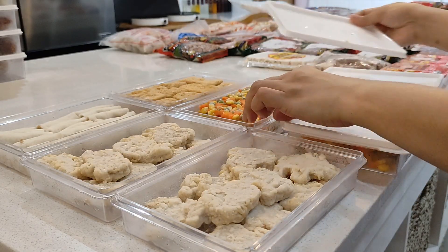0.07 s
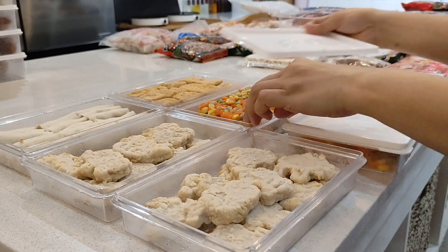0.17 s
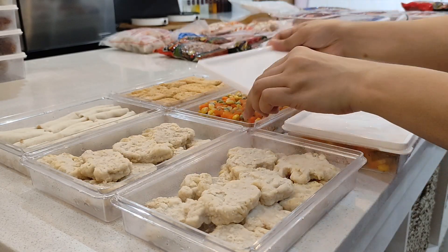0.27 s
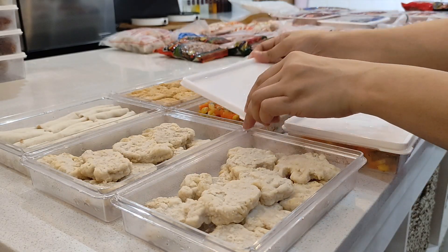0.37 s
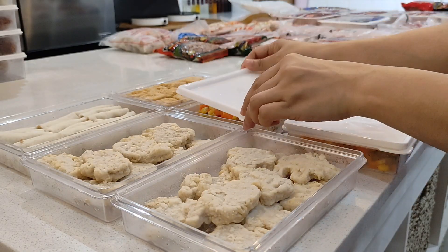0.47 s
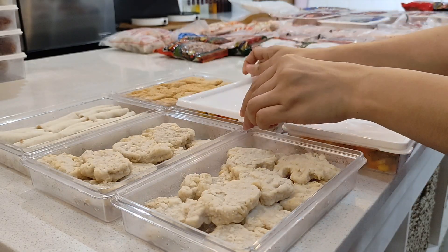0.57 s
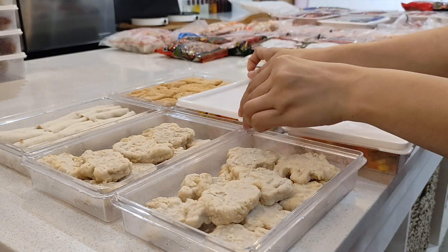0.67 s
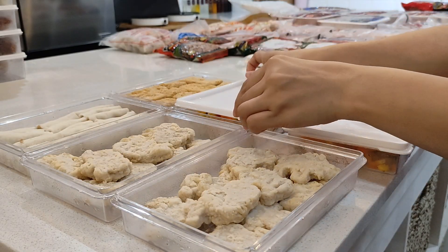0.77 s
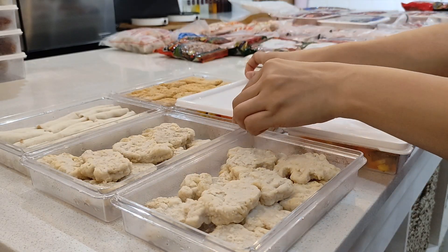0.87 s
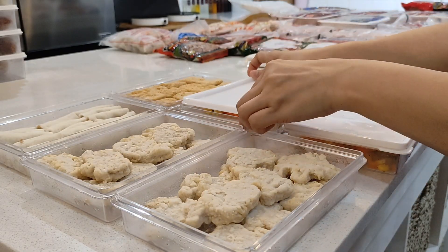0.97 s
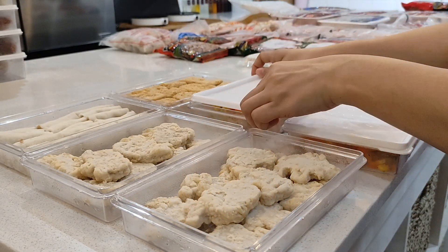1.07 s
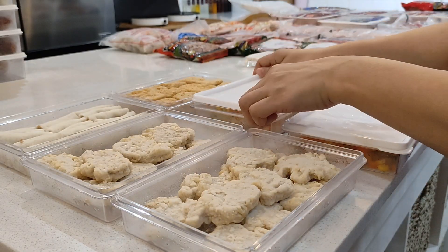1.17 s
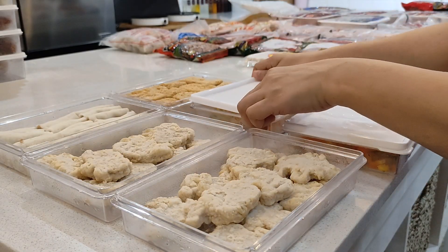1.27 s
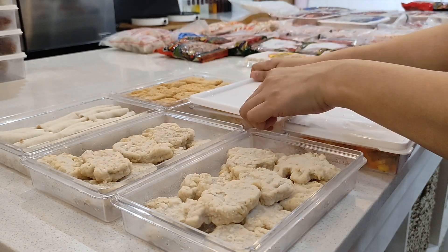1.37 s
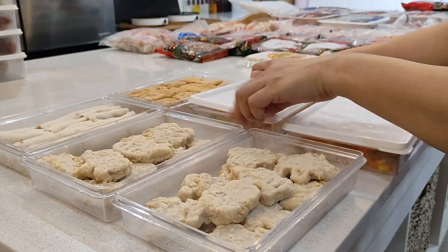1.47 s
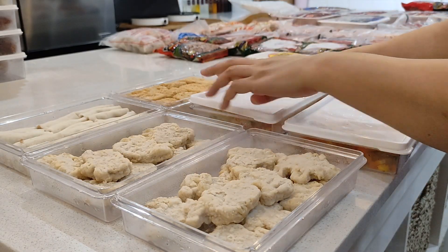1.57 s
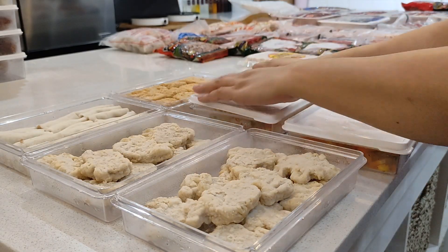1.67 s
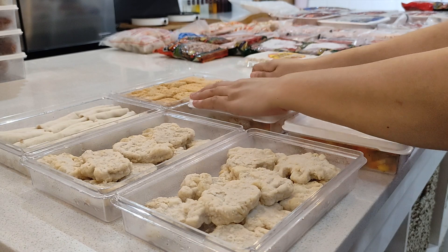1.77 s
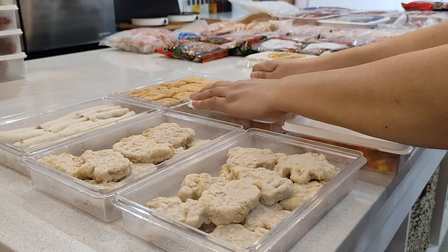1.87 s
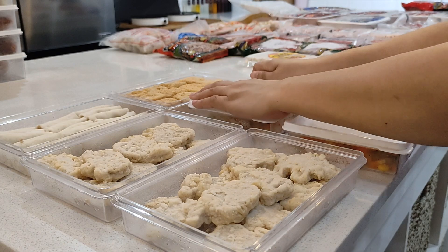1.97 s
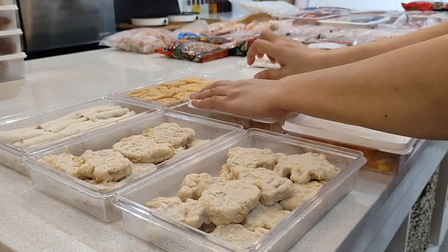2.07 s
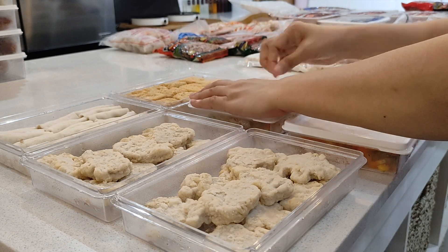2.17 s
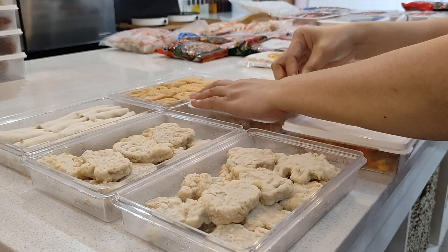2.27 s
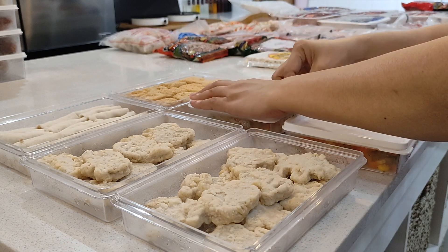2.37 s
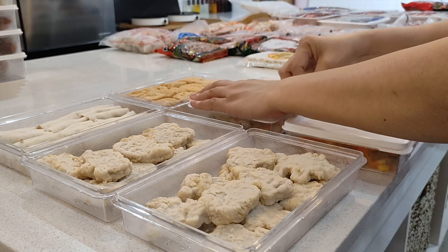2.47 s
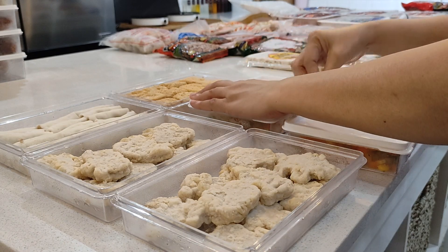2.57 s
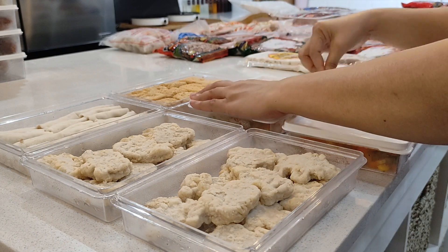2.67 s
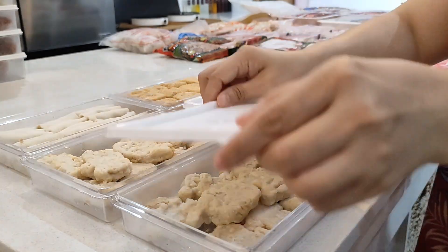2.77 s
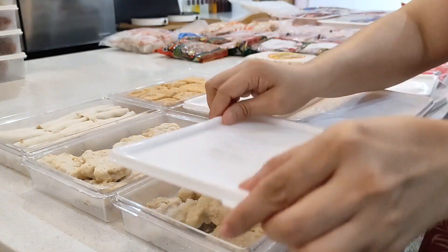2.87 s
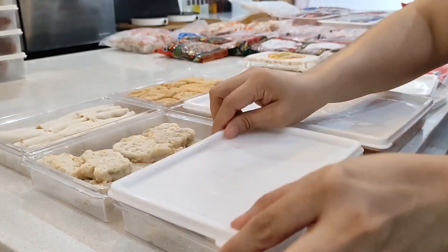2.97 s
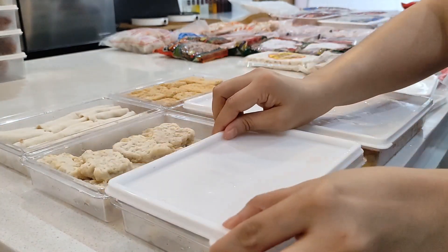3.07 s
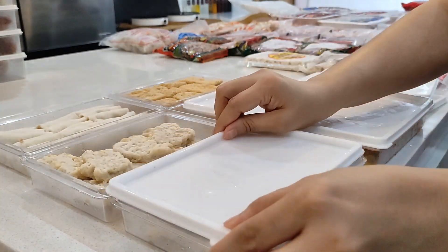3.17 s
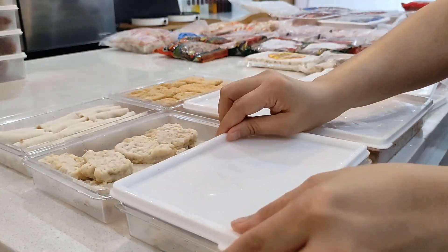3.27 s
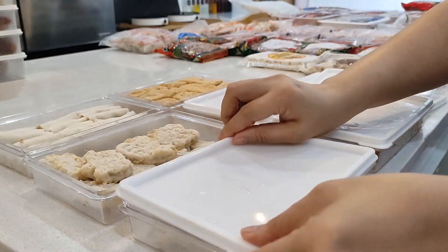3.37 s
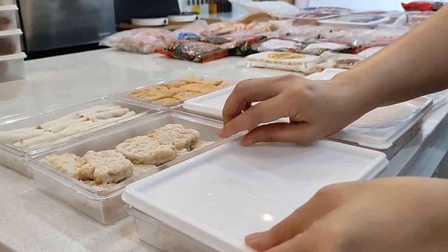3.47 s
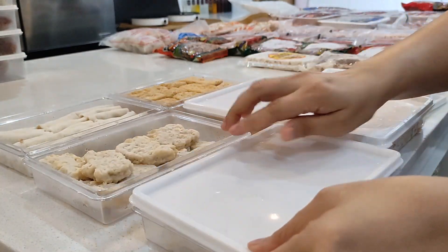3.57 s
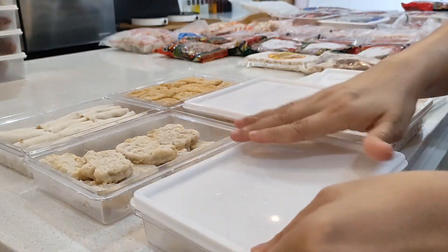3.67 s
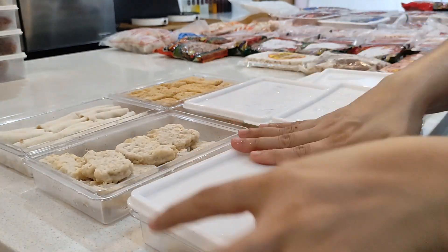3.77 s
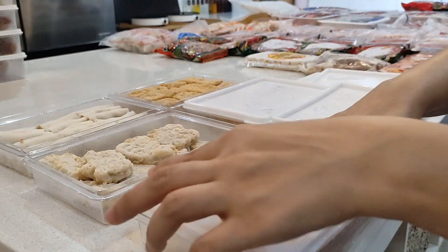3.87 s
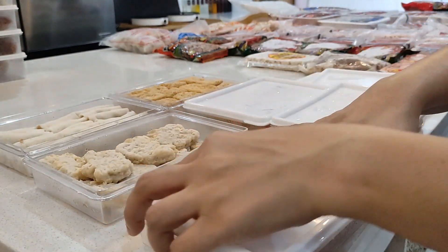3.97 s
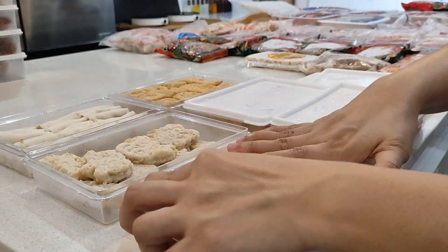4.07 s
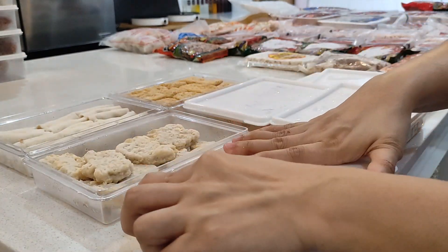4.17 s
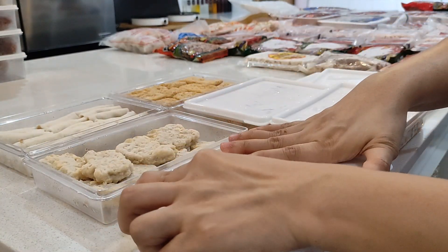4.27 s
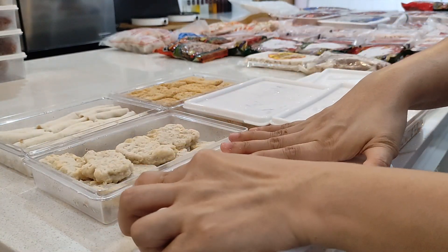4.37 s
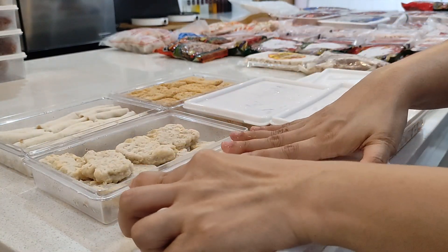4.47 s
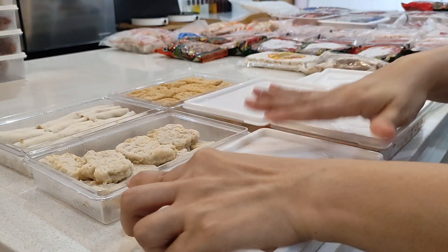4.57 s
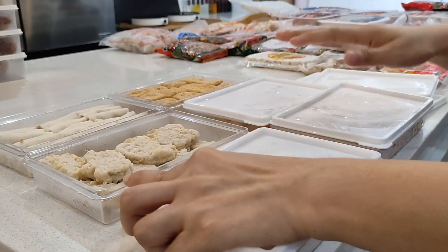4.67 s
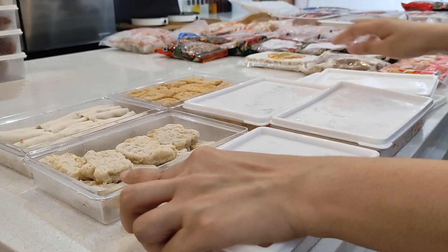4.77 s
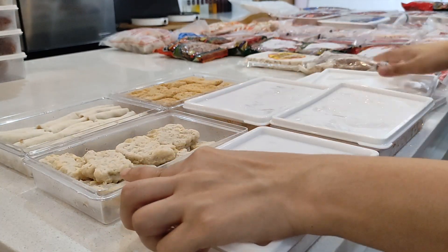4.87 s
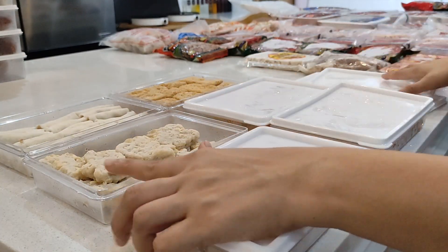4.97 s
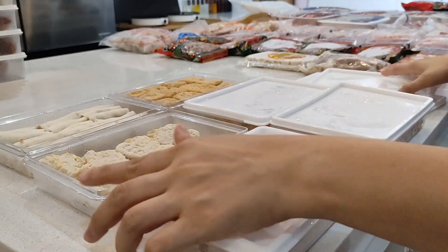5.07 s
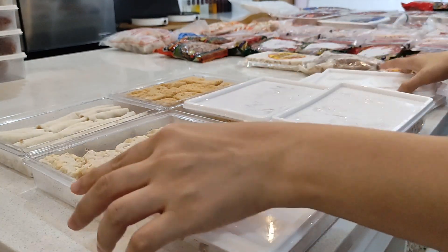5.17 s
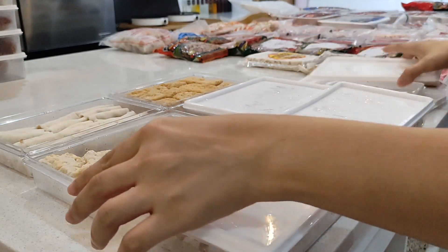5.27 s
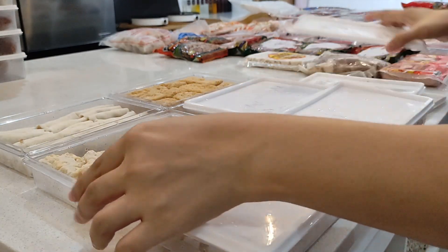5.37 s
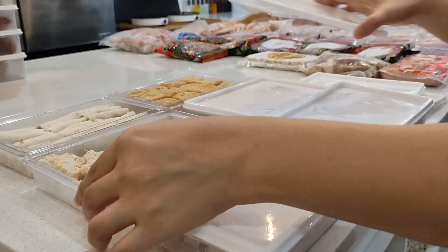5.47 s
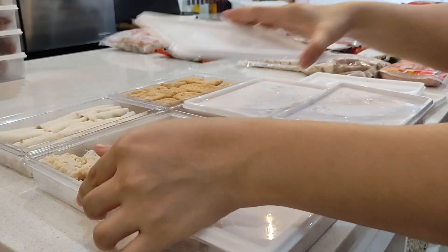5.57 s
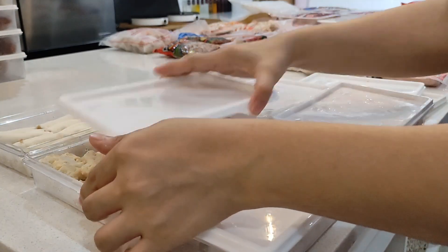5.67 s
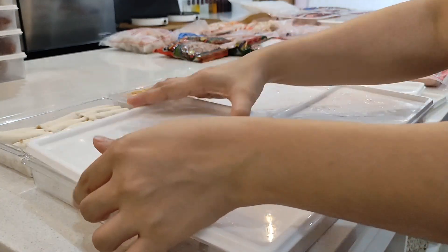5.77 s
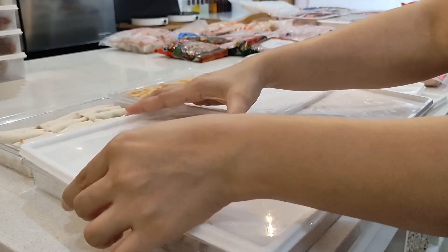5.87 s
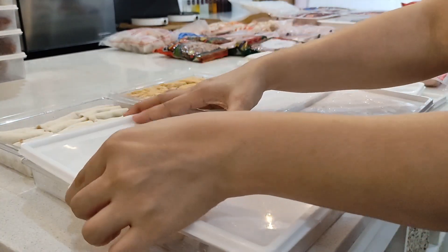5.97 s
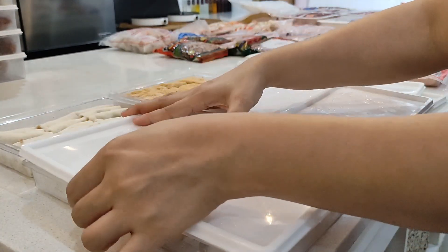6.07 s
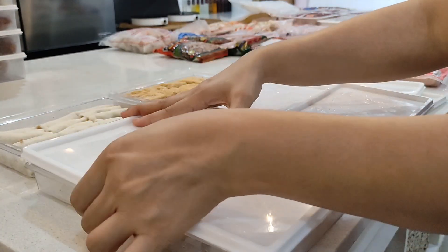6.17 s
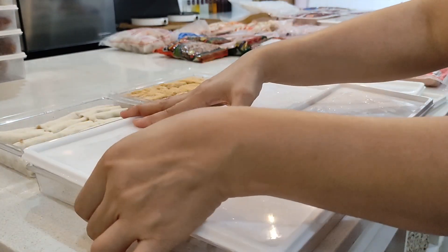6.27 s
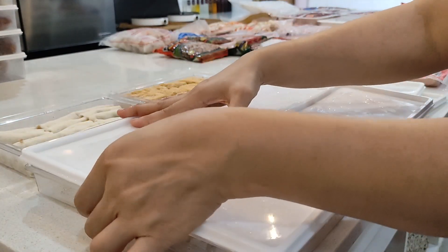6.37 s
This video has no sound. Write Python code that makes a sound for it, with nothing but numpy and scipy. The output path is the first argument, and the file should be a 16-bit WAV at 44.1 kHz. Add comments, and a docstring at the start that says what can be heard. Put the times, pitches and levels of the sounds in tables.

```python
"""Closing food boxes in a kitchen

Thin plastic lids are laid on boxes and pressed shut on a counter, close to a camera's two microphone ports.
Rims knock, snap and tick, a palm thuds on a box, and fingers and lids scrape and rustle. A rim creaks into
its groove and squeezed air whistles faintly. Hard walls answer the blows and creaks, over a low hum."""
import sys
import numpy as np
from scipy import signal
from scipy.fft import rfft, irfft, next_fast_len
from scipy.io import wavfile
from scipy.ndimage import map_coordinates

SR = 44100
rng = np.random.default_rng(int(sys.argv[2]) if len(sys.argv) > 2 else 0)


def put_to_file(sound):
    """Save the sound as 16-bit audio at rate SR, in the file named by the first command-line argument."""
    columns = np.atleast_2d(sound).T  # one column per channel
    safe = np.clip(columns, -1, 1)
    whole_steps = np.round(safe * 32767)
    wavfile.write(sys.argv[1], SR, whole_steps.astype(np.int16))


N = 282681


def amp(db):
    """Decibels to gain."""
    return 10 ** (np.asarray(db) / 20)


def unit(x):
    """Scale to rms 1."""
    return x / np.sqrt(np.mean(x ** 2) + 1e-20)


def peaked(x):
    """Scale to peak 1."""
    return x / np.max(np.abs(x))


def along(points, hz):
    """Read (Hz, value) points on a log frequency axis."""
    point_hz, values = np.transpose(points)
    return np.interp(np.log(hz + 1), np.log(point_hz + 1), values)


def curves(rows):
    """One value per sample for each column after the time."""
    times, *columns = np.transpose(rows)
    return [np.interp(np.arange(N) / SR, times, column) for column in columns]


def wobble(rate):
    """A smooth random curve with rate knots a second."""
    return map_coordinates(rng.standard_normal(int(N * rate / SR) + 4), [np.arange(N) * rate / SR])


def swell(t, release_at_s, attack_s, release_s):
    """Attack, hold and release; t counts from the start."""
    return np.clip(t / attack_s, 0, 1) ** 2 * np.clip(1 - (t - release_at_s) / release_s, 0, 1) ** 2


def filtered(x, response):
    """Filter x by a gain given as a function of Hz."""
    n = x.shape[-1]
    size = next_fast_len(n + 2048)
    return irfft(rfft(x, size) * response(np.fft.rfftfreq(size, 1 / SR)), size)[..., :n]


def noise_band(centre_hz, half_width_hz):
    """A narrow band of noise at rms 1."""
    return unit(filtered(rng.standard_normal(N), lambda hz: 1 / (1 + ((hz - centre_hz) / half_width_hz) ** 2)))


def diffuse(pair, colour):
    """Colour two noises and blend them like sound reaching the ports from all sides."""
    # Each row: frequency in Hz, left-right correlation.
    likeness = [(30, 0.28), (200, 0.91), (600, 0.42), (1500, 0.033), (4000, 0.033), (12000, 0.039)]
    angle = lambda hz: np.arccos(np.clip(along(likeness, hz), -1, 1)) / 2
    mid, side = filtered(pair, lambda hz: amp(along(colour, hz)) * [np.cos(angle(hz)), np.sin(angle(hz))])
    return np.array([mid + side, mid - side])


def kitchen(x):
    """Hard walls answer 5 ms late, each frequency dying at its own speed."""
    # Each row: frequency in Hz, reverberation time (t60) in seconds.
    decay_times = [(200, 0.64), (500, 0.46), (1000, 0.51), (2000, 0.55), (3000, 0.67), (6000, 0.54),
                   (10000, 0.6), (15000, 0.51)]
    # Each row: frequency in Hz, strength of the walls' answer in dB.
    wall_colour = [(200, -10.5), (500, -1), (900, -5.5), (1600, -8), (2800, -4.5), (5000, -7.5), (7300, -7),
                   (9000, -6.5), (12000, -7), (15500, -5)]
    hz, t, spectra = signal.stft(rng.standard_normal((2, SR // 2)), SR, nperseg=256)
    tail = signal.istft(spectra * amp(-60 * t / along(decay_times, hz)[:, None]), SR, nperseg=256)[1]
    tail = diffuse(tail / np.linalg.norm(tail[0]), wall_colour)
    return signal.fftconvolve(np.pad(x, (220, 0))[None], tail, axes=1)


def place(left, right, to_walls, start_s):
    """A close sound reaches the right port first, then the left; the kitchen answers."""
    # Where the hands work. Each row: time in seconds, left port's lag in ms, left over right in dB.
    hands = [(0, 0.099, -0.8), (1.5, 0.084, -2.5), (2.851, 0.06, -3.5), (3.3, 0.072, -2),
             (3.7, 0.023, -1.5), (4.3, 0.056, -2), (5.6, 0.21, -3.5), (6.41, 0.18, -2.2)]
    times, lags, pans = np.transpose(hands)
    lag_ms, pan_db = np.interp(start_s, times, lags), np.interp(start_s, times, pans)
    late_left = filtered(left, lambda hz: np.exp(-2j * np.pi * hz * lag_ms / 1000))
    sound = kitchen(to_walls)
    sound[:, :len(left)] += amp([[pan_db / 2], [-pan_db / 2]]) * [late_left, right]
    start = round(start_s * SR)
    return np.pad(sound[:, :N - start], ((0, 0), (start, max(N - start - sound.shape[1], 0))))


def hum():
    """Machines and the street drone through the room, with two wavering machine tones."""
    # Each row: time in seconds, level in dB.
    levels = [(0, -49.5), (1.02, -52), (1.96, -52), (2.95, -52.5), (3.41, -55.5), (3.93, -47.5),
              (4.19, -52.5), (5.34, -54), (5.69, -54), (6.41, -54)]
    # Each row: frequency in Hz, relative spectral density in dB.
    colour = [(12, -56), (20, -38), (32, -58), (49, -14.5), (87, -10), (135, -4), (195, -5), (232, -1.5),
              (273, -6), (357, -4.5), (461, -13.5), (558, -14), (900, -20), (1170, -43), (1980, -120)]
    # Each row: centre in Hz, half width in Hz, level in dB.
    machine_tones = [(63, 5.3, -67.5), (367.7, 9.1, -66)]
    (db,) = curves(levels)
    out = amp(db + 1.8 * wobble(1.81)) * unit(diffuse(rng.standard_normal((2, N)), colour))
    for hz, half_width_hz, tone_db in machine_tones:
        out += amp(tone_db) * noise_band(hz, half_width_hz)
    return out


def rumble():
    """A low drone comes and goes, the same at both ports."""
    # Each row: time in seconds, level in dB.
    levels = [(0, -58), (.5, -65.5), (1.5, -55), (2.12, -54), (2.89, -65), (3.62, -64), (3.84, -55),
              (4.1, -69), (6.03, -62), (6.21, -56), (6.41, -68)]
    (db,) = curves(levels)
    return amp(db + 1.2 * wobble(17)) * noise_band(centre_hz=145, half_width_hz=25)


def sliding():
    """Skin and plastic drag over plastic in grainy strokes, over room hiss of the same colours."""
    # Each row: start in seconds, seconds until release, scrape level in dB, rustle level in dB.
    strokes = [(0, 0.14, -55, -64), (.3, 0.082, -71, -70), (0.445, 0.35, -60, -69), (.82, 0.26, -61, -65.5),
               (1.085, .1, -58, -75), (1.236, .17, -58.5, -59.5), (1.454, 0.061, -54.5, -51.5),
               (1.541, 0.17, -60, -60), (1.88, 0.12, -63, -66), (2.265, 0.083, -63, -76),
               (2.514, 0.19, -53.5, -64.5), (3.164, 0.17, -63, -62.5), (3.443, 0.31, -56, -66),
               (4.113, 0.18, -56, -73), (4.373, 0.21, -64.5, -71.5), (4.802, 0.19, -63.5, -65.5),
               (5.14, 0.076, -67, -66.5), (5.678, .25, -53.5, -73), (6.02, 0.16, -66, -66)]
    # The dull scrape and the bright rustle. Each row: frequency in Hz, relative spectral density in dB.
    scrape_colour = [(240, -39), (400, -15), (471, -7), (635, -11.5), (808, -2.5), (881, -2.5), (1230, -1),
                     (1390, -4.5), (1530, -1.5), (2180, -11), (4000, -17), (5200, -71), (8800, -120)]
    rustle_colour = [(1470, -64), (2500, -4), (3110, -12), (4310, 1.5), (5310, -4.5), (6700, -2),
                     (7250, -12), (8660, 0), (9890, -5.5), (12500, 0.5), (14900, -13), (15600, -8),
                     (16000, -58)]
    out, t = np.zeros((2, N)), np.arange(N) / SR
    grain = amp(1.25 * wobble(120))
    start_s, held_s, scrape_db, rustle_db = np.transpose(strokes)[:, :, None]
    shape = swell(t - start_s, held_s, attack_s=0.0097, release_s=0.061)
    for db, colour, hiss_db in (scrape_db, scrape_colour, -62.5), (rustle_db, rustle_colour, -69):
        hiss_power = amp(hiss_db + 1.7 * wobble(6.7)) ** 2
        stroke_power = np.sum((amp(db) * shape) ** 2, axis=0) * grain ** 2
        out += np.sqrt(hiss_power + stroke_power) * unit(diffuse(rng.standard_normal((2, N)), colour))
    return out


def thuds():
    """A palm pushes the box, which answers with one low, soft mode."""
    # Each row: start in seconds, gain in dB.
    pushes = [(0.021, -33), (0.431, -31), (.826, -36), (3.315, -20), (3.683, -29), (3.752, -18.5),
              (3.878, -40), (3.925, -37)]
    box_hz, t60_s, rise_s = 240, 0.047, 0.0068
    t = np.arange(SR // 10) / SR
    thud = amp(-60 * t / t60_s) * (1 - np.exp(-t / rise_s)) * np.sin(2 * np.pi * box_hz * t)
    return sum(place(*[amp(db) * thud] * 3, start_s) for start_s, db in pushes)


def crack(peak_db, tilt_db, t60_s):
    """The rim cracks: a separate noise burst for each port, and a click to feed the walls."""
    # The bright crack as heard at the ports. Each row: frequency in Hz, relative spectral density in dB.
    crack_colour = [(1180, -21), (2000, -6), (2240, 0.5), (4180, -2.5), (5440, -7), (5990, -10), (6490, -8.5),
                    (8290, -12), (8980, -4.5), (10300, -17), (11500, -8.5), (14600, -20.5), (15600, -30),
                    (16300, -39)]
    t = np.arange(SR // 10) / SR
    colour = lambda hz: amp(along(crack_colour, hz) + tilt_db * np.log2(np.maximum(hz, 1500) / 6000))
    envelope = amp(-60 * t / t60_s) * (1 - np.exp(-t / 0.00005))
    pair = amp(peak_db) * peaked(filtered(envelope * rng.standard_normal((2, len(t))), colour))
    click = filtered(np.arange(len(t)) == 40, colour)
    return *pair, click * np.linalg.norm(pair) / np.sqrt(2) / np.linalg.norm(click)


def knocks():
    """Rims knock and snap: each blow cracks at the rim and rings the lid modes near its pitch."""
    # Each row: start in seconds, ring's peak in dB, pitch in Hz, upper modes' gain in dB, their centre in
    # Hz, t60 at 800 Hz in seconds, crack over ring in dB, crack's tilt in dB per octave.
    blows = [(.023, -22.5, 480, -18.5, 1540, 0.015, -10, -1.2), (.29, -36.5, 670, -2, 1630, .028, 1, 5),
             (0.404, -28, 900, -8, 1210, 0.032, -3.5, 1), (0.431, -29.5, 1130, -20, 1150, 0.013, -19, .1),
             (.491, -23.5, 806, -3, 1770, 0.018, -10, -1), (.516, -12, 740, -10, 1680, 0.026, -14.5, 2),
             (.539, -28.5, 685, -30, 1320, 0.049, -25, 6), (.574, -34, 620, -13, 1430, 0.033, -19, 2.2),
             (.609, -37.5, 766, -12, 1760, .03, -6, -4), (.659, -36, 690, -20, 1570, 0.035, -28, 1.2),
             (.695, -39, 720, -17, 1550, 0.035, -6, .1), (0.775, -43.5, 1250, -9, 1310, 0.028, -20, 2),
             (.826, -40.5, 654, -2, 1580, 0.042, 5, 1), (0.883, -41.5, 476, -4, 1560, 0.021, .6, 2),
             (0.97, -43, 479, -10, 1500, .024, -23, .1), (1.016, -32.5, 623, -16, 1300, .031, -16, .1),
             (1.169, -38.5, 460, -12, 1480, .069, -24, .1),
             (1.187, -30.5, 1000, -22, 1150, 0.023, -25, 2.2), (1.202, -27.5, 790, 3, 1220, 0.033, -4.5, 0),
             (1.221, -34, 500, -16, 1290, 0.046, -3, 9), (1.243, -34, 470, -14, 1500, 0.022, -25, .1),
             (1.652, -35, 513, -20, 1290, 0.037, -7, -7), (2.317, -41.5, 507, -9, 1400, 0.031, -15, 7),
             (2.84, -25, 760, -3, 1550, .039, 2, -2), (2.93, -16, 850, -6, 1290, 0.026, 1, 0.8),
             (2.937, -20.5, 585, -11, 1270, 0.037, -6, -4), (2.957, -35, 1020, -25, 1150, .024, -22, -1.5),
             (3.135, -29, 665, -19, 1400, 0.023, -6.5, -2.5),
             (3.254, -33.5, 474, -28, 1570, 0.022, -21, 2.5), (3.308, -32, 1000, -13, 1550, .033, -9, -1),
             (3.314, -30, 670, -13, 1150, .046, 3, -3), (3.317, -20.5, 567, -9, 1690, 0.032, -8, -4),
             (3.321, -4, 536, -1.5, 1250, 0.02, -4, 3), (3.664, -27, 610, -35, 1170, 0.046, -3.5, 6.5),
             (3.684, -36.5, 1010, -20, 1600, .047, 1, -1), (3.751, -34, 760, -11, 1530, 0.027, -9.5, -6),
             (3.866, -37, 730, -29, 1480, 0.026, -5, 3), (3.879, -36, 456, -12, 1220, 0.028, -4, 0),
             (4.122, -42, 670, 4, 1610, .021, 5.5, -1), (4.142, -26, 634, -23, 1800, 0.017, -3.5, -2),
             (4.195, -36, 802, 11, 1770, .019, 7, -6.5), (4.268, -43, 740, 2, 1760, 0.021, 2, -6),
             (4.286, -45, 813, -6, 1900, .025, -3, -6), (4.467, -41.5, 465, -19, 1150, .046, -21, .1),
             (4.572, -47, 571, -7, 1490, .015, -4, -6), (4.889, -53, 1150, -1.5, 1160, .038, 8, -5),
             (5.689, -32, 730, -3, 1170, 0.045, 5, 6.5), (5.705, -29, 640, -13.5, 1510, 0.075, 2.2, 4),
             (5.744, -20, 794, -6, 1560, 0.04, -2.5, 1.2), (5.761, -33, 790, -27, 1580, 0.061, -22, .1),
             (5.778, -31, 650, -11, 1570, .042, -12, -2), (5.806, -32, 686, -29, 1150, 0.074, -24, .1),
             (5.84, -39.5, 670, -25, 1540, 0.046, -17, -3),
             (5.88, -28.5, 1000, -19, 1190, 0.021, -10.5, -0.5),
             (5.911, -23.5, 970, -41, 1150, 0.015, -18.5, -1.2),
             (6.013, -32, 760, -11, 1170, 0.02, -18, .1), (6.121, -30, 744, -13, 1720, .021, -14, -10),
             (6.212, -38.5, 575, -19, 1680, 0.031, -26, -2.2),
             (6.341, -39.5, 535, -26, 1590, 0.034, -28, -1), (6.382, -43, 620, -24, 1320, .026, -28, 5)]
    # A lid on its box. Each row: mode frequency in Hz, relative level in dB.
    lid_modes = [(430, -2.5), (530, -3.5), (625, -1.5), (710, -0.5), (795, 2), (945, 3.5), (1050, 0.5),
                 (1220, 1), (1360, 4.5), (1570, 7), (1730, 6.5), (1900, -14), (2400, -6), (2650, -27),
                 (2950, 6)]
    hz, mode_db = np.array(lid_modes).T[:, :, None]
    out, t = np.zeros((2, N)), np.arange(SR // 10) / SR
    for start_s, db, pitch_hz, upper_db, upper_hz, t60_s, crack_db, tilt_db in blows:
        near_pitch = amp(-27 * np.log2(hz / pitch_hz) ** 2)
        upper = amp(upper_db - 48 * np.log2(hz / upper_hz) ** 2)  # reached by a hard, quick blow
        gain = (near_pitch + upper) * amp(mode_db + rng.normal(0, 2, hz.shape))
        detune = 1 + rng.normal(0, .015, hz.shape)  # fingers load the lid differently at every blow
        envelope = amp(-60 * t / t60_s * (hz / 800) ** 0.13) * (1 - np.exp(-t / 0.0013))
        phase = rng.uniform(-1.76, 1, hz.shape)  # modes reach the ports over different paths
        modes = np.sum(gain * envelope * np.sin(2 * np.pi * hz * detune * t + phase), axis=0)
        ring = np.roll(amp(db) * peaked(modes), 25)  # the lid answers a moment after the rim
        left, right, click = crack(db + crack_db, tilt_db, t60_s=0.024)
        out += place(ring + left, ring + right, ring + click, start_s)
    return out


def ticks():
    """Bright little cracks of the rim that do not ring the lid."""
    # Each row: start in seconds, peak in dB.
    rim_ticks = [(1.29, -42), (1.356, -35), (1.438, -31), (1.464, -37), (1.478, -28.5), (1.486, -30),
                 (1.584, -34.5), (1.617, -39), (1.631, -32), (3.82, -48), (4.391, -50)]
    return sum(place(*crack(db, tilt_db=4.5, t60_s=0.025), start_s) for start_s, db in rim_ticks)


def creaks():
    """The rim sticks and slips into its groove: one jerk a cycle, slower and sharper as it seats."""
    # Each row: start and length in seconds, first and last slip rate in Hz, first and last gain in dB,
    # sharpness aimed for (0-1), grit's gain in dB, grit's treble corner in Hz.
    seatings = [(3.961, .059, 563, 227.7, -28.5, -28, 0.96, -17, 2300),
                (4.16, .021, 985, 734, -31.5, -18, 0.41, -7, 6800)]
    attack_s, release_s = 0.0057, 0.0073
    out, harmonic = np.zeros((2, N)), np.arange(1, 21)[:, None]
    for start_s, length_s, first_hz, last_hz, first_db, last_db, last_sharp, grit_db, grit_hz in seatings:
        t = np.arange(0, length_s, 1 / SR)
        seated = t / length_s
        slip_hz = first_hz * (last_hz / first_hz) ** seated * (1 + rng.normal(0, 0.094, len(t)))
        phase = 2 * np.pi * np.cumsum(slip_hz) / SR
        sharpness = np.clip(0.2 + (last_sharp - 0.2) * seated, .05, .9)
        jerks = np.sum(sharpness ** (harmonic - 1) * np.cos(harmonic * phase), axis=0)
        # The lid radiates little outside its own modes.
        jerks = filtered(jerks, lambda hz: 1 / (1 + (hz / 1400) ** 4) / (1 + (300 / (hz + 1)) ** 4))
        scrapes = (1 + np.cos(phase)) ** 2 * rng.standard_normal((2, len(t)))  # one at each slip
        scrapes = filtered(scrapes, lambda hz: hz ** 2 / (hz ** 2 + 1500 ** 2) / (1 + (hz / grit_hz) ** 2))
        grit = amp(grit_db) * sharpness * unit(scrapes)
        gain = amp(first_db + (last_db - first_db) * seated)
        left, right = -gain * swell(t, length_s - release_s, attack_s, release_s) * (jerks + grit)
        out += place(left, right, left, start_s)
    return out


def whistle():
    """Air squeezed past the rim: a faint, thin tone that falls as the pressure eases."""
    # Each row: time in seconds, pitch in Hz, level in dB.
    glide = [(3.97, 12800, -95), (4.0, 13500, -70), (4.03, 13500, -71), (4.07, 12700, -67),
             (4.1, 12000, -68), (4.125, 11900, -90)]
    hz, db = curves(glide)
    return amp(db + 1.8 * wobble(60)) * np.sin(2 * np.pi * np.cumsum(hz + 60 * wobble(200)) / SR)


def scene():
    """The room and the work on the counter, as they reach the two ports."""
    return hum() + rumble() + sliding() + thuds() + knocks() + ticks() + creaks() + whistle()


def record(dry):
    """The camera rounds off peaks and cuts the deepest bass and highest treble; the level dips once."""
    dip_s, half_width_s, dip_db = 2.727, .004, -16
    ceiling, bass_hz, top_hz = .85, 30, 16400
    dip = amp(dip_db * np.exp(-((np.arange(N) / SR - dip_s) / half_width_s) ** 2))
    rounded = dry / (1 + np.abs(dry / ceiling) ** 4) ** .25
    return filtered(rounded * dip, lambda hz: (hz < top_hz) / (1 + (bass_hz / (hz + 1)) ** 2))


dry = scene()
out = record(dry)
put_to_file(out)
```